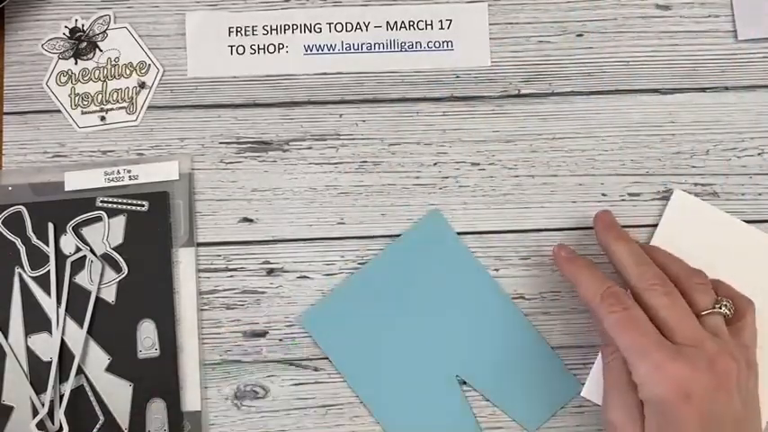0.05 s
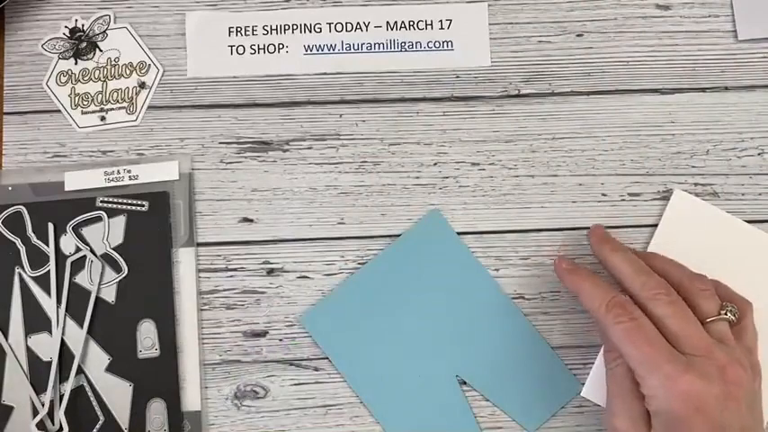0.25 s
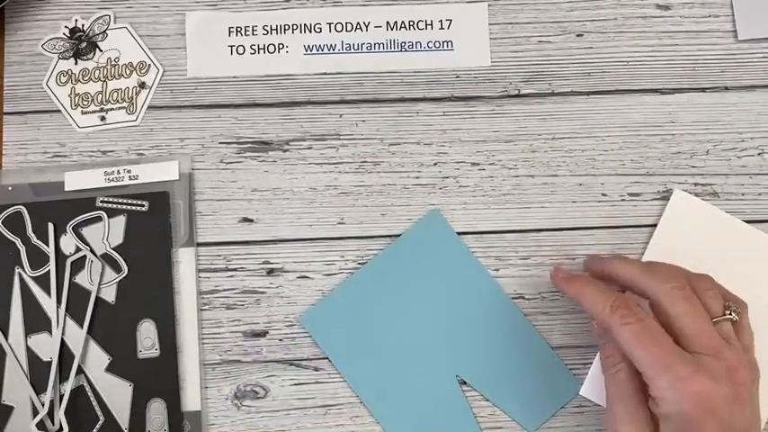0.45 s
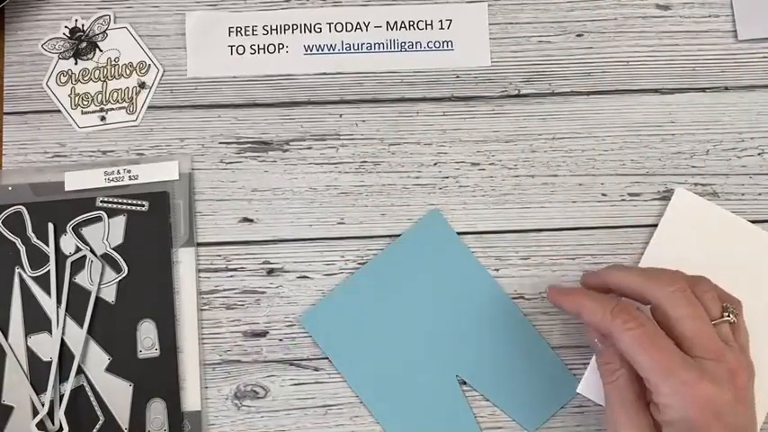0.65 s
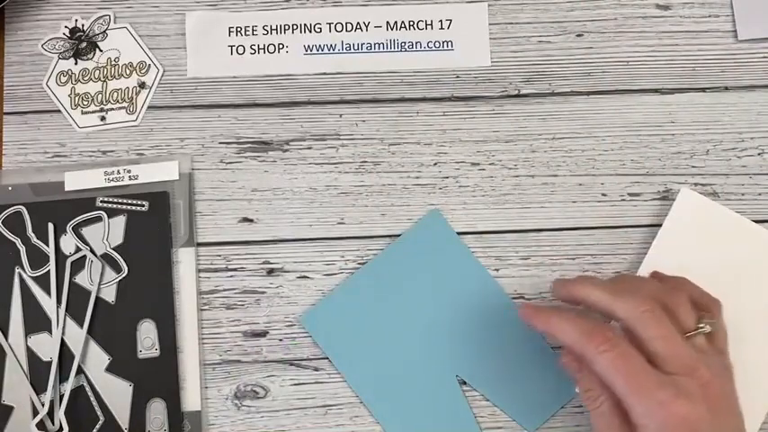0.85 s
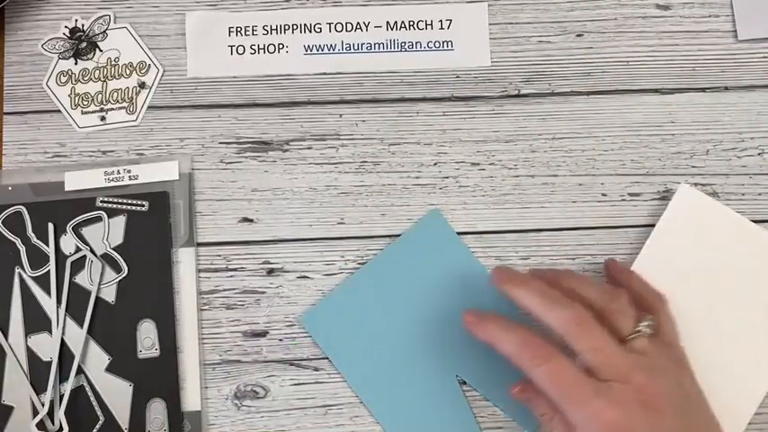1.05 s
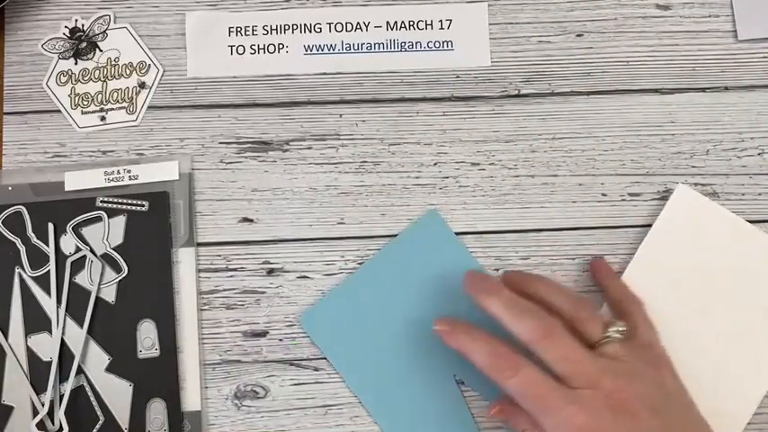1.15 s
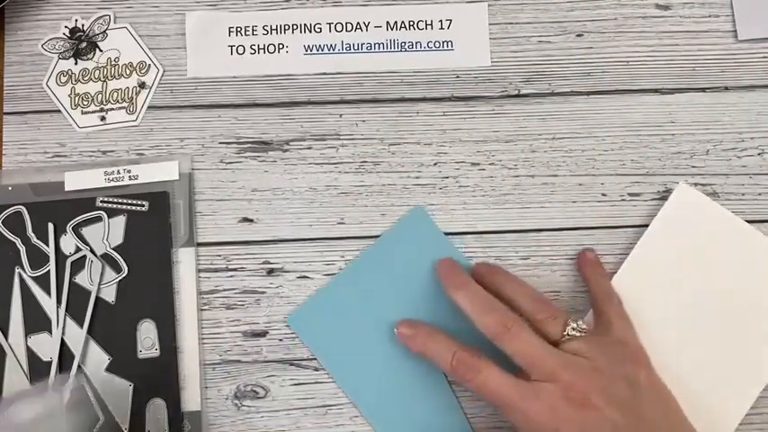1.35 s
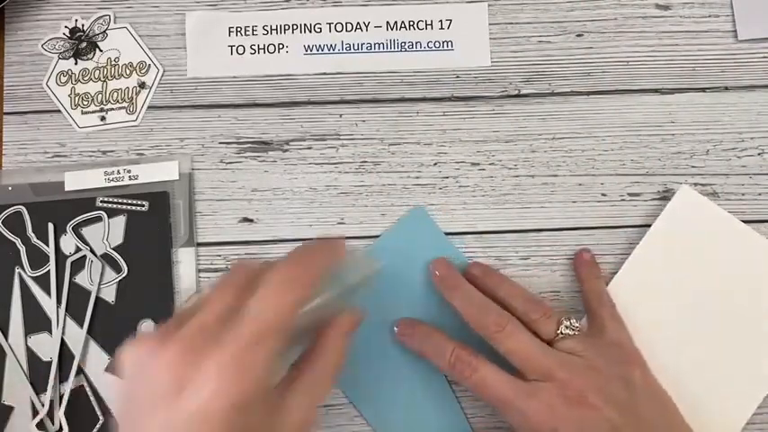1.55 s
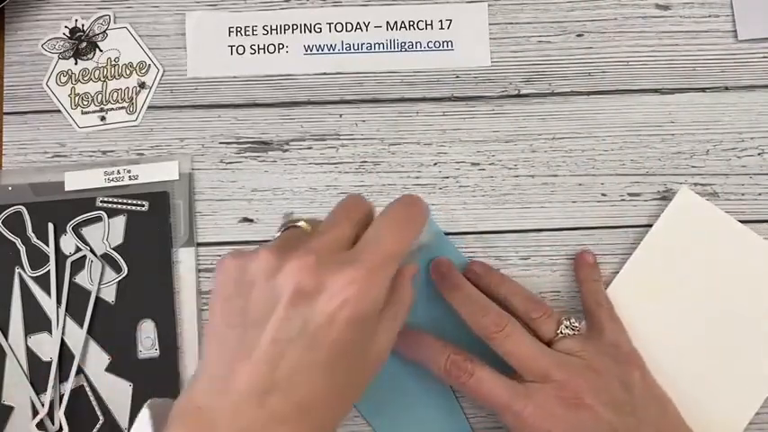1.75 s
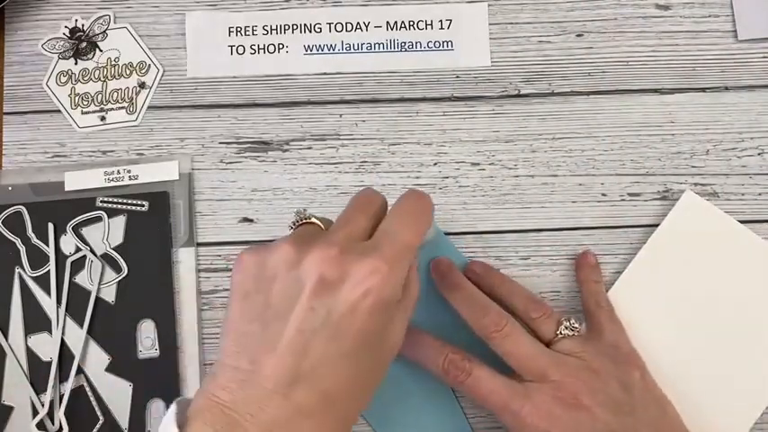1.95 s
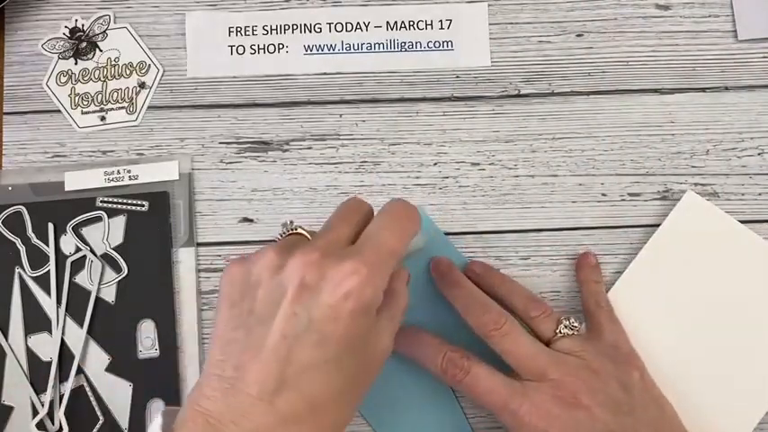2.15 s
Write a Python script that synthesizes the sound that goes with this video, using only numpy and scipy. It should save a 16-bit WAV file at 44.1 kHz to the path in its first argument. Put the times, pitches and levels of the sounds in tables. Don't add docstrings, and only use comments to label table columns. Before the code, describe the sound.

Close up in a quiet room, faint card ticks come before a sharp double-burst clatter of a small hard tool on wood, then lighter grainy scrapes and clicks, whispery paper sliding, and a dull soft thump.

```python
import sys
import numpy as np
from scipy import signal
from scipy.fft import rfft, irfft, next_fast_len
from scipy.io import wavfile
from scipy.ndimage import map_coordinates

SR = 44100
rng = np.random.default_rng(int(sys.argv[2]) if len(sys.argv) > 2 else 0)


def materialize(psi):
    bounded = np.clip(np.atleast_2d(psi).T, -1, 1)
    quanta = np.round(bounded * 32767).astype(np.int16)
    wavfile.write(sys.argv[1], SR, quanta)


def voltage_ratio(decibels):
    exponent = np.asarray(decibels, float) / 20
    return 10 ** exponent


N = 97020

# [f/Hz, width/Hz, level/dB]
DESK_MODES = [(91.4, 31, -7.5), (138.4, 16, -4), (188.6, 18, -5), (264.4, 20, -3), (319.1, 16.7, -0.5),
              (416.4, 63, -10.5), (550, 80, -14)]
# [f/Hz, width/Hz, level/dB]
CARD_MODES = [(1940, 310, 6), (3520, 1800, -4.5), (3950, 110, -8), (5950, 580, -11.5)]
# [f/Hz, width/Hz, level/dB]
HELD_TOOL_MODES = [(518, 138, -7.5), (928, 180, -7), (1316, 70, 3.5), (1972, 107, -6), (2837, 106, -7.5),
                   (4020, 170, -14), (4840, 150, -19.5), (6070, 200, -21)]
# [f/Hz, level/dB]
SNAP_SPECTRUM = [(1500, -18.5), (2500, -3), (4000, 1), (7000, -4.5), (12000, -7.5), (16000, 1.5)]
HARD_PUSH_S = 0.00031


def unit(x):
    return x / np.sqrt(np.mean(x ** 2) + 1e-20)


def along(points, hz):
    f, value = np.transpose(points)
    return np.interp(np.log(hz + 1), np.log(f + 1), value)


def wobble(rate):
    knots = rng.standard_normal(int(N * rate / SR) + 4)
    return map_coordinates(knots, [np.arange(N) * rate / SR])


def filtered(x, response):
    m = next_fast_len(x.shape[-1] + SR // 2)
    return irfft(rfft(x, m) * response(np.fft.rfftfreq(m, 1 / SR)), m)[..., :x.shape[-1]]


def body(modes, scatter_db=0):
    gain = voltage_ratio(np.zeros(len(modes)) + scatter_db)

    def response(f):
        total = 0
        for k, (hz, width, db) in enumerate(modes):
            resonance = 1j * f * width / (hz * hz - f * f + 1j * f * width)
            total = total + (-1) ** k * gain[k] * voltage_ratio(db) * resonance
        return total
    return response


def noise(spectrum):
    return unit(filtered(rng.standard_normal(N), lambda f: voltage_ratio(along(spectrum, f))))


def narrow(size, width_hz):
    z = rng.standard_normal((2, size))
    f = np.fft.fftfreq(size, 1 / SR)
    v = np.fft.ifft((z[0] + 1j * z[1]) / (1 + (2 * f / width_hz) ** 2))
    return v / np.sqrt(np.mean(abs(v) ** 2) / 2)


def contacts(rows, modes, push_s, colour):
    out, t = np.zeros(N + SR), np.arange(SR // 3) / SR
    crack = np.tile(noise(colour), 2)
    push = t / push_s * np.exp(-t / push_s)
    rise_s, scatter_db, detune, ring_top_hz = 0.00063, 3, 0.03, 5970
    for s, ring_db, thump_db, crack_db, length in rows:
        at = round(s * SR)
        burst = 2 * (1 - np.exp(-t / rise_s)) * np.exp(-2 * t / length)
        shifted = np.array(modes) * [[1 + detune * d, 1, 1] for d in rng.standard_normal(len(modes))]
        modal = body(shifted, scatter_db * rng.standard_normal(len(modes)))
        chatter = burst * rng.standard_normal(len(t))
        ring = filtered(chatter, lambda f: modal(f) / (1 + 1j * f / ring_top_hz) ** 2)
        thump = filtered(push, body(DESK_MODES, scatter_db * rng.standard_normal(len(DESK_MODES))))
        here = out[at:at + len(t)]
        here += voltage_ratio(ring_db - 4.5) * ring / abs(ring).max()
        here += voltage_ratio(thump_db + 6) * thump / abs(thump).max()
        here += voltage_ratio(crack_db + 4.5) * burst * crack[at:at + len(t)]
    return out[:N]


def tool_drop():
    # [t/s, tool ring level/dB, desk thump level/dB, crack level/dB, contact length/s]
    blows = [(.2032, -19.5, -33.5, -45, 0.0048), (.2062, -19, -30, -46.5, 0.007),
             (.2135, -23.5, -41.5, -40, 0.0096), (.2205, -27, -36, -46, 0.0071),
             (.2835, -32, -46, -55, 0.0097), (.3160, -23.5, -31, -35, 0.0058),
             (.3392, -16.5, -42, -44, 0.0072), (.3535, -16.5, -35, -38, 0.01),
             (.3580, -28.5, -39, -39.5, 0.0094), (.3660, -25.5, -48.5, -52, 0.022),
             (.3790, -22.5, -30, -58.5, 0.0032), (.3960, -35, -36, -61.5, 0.014),
             (.4250, -59, -41.5, -67, 0.0053)]
    # [f/Hz, width/Hz, level/dB]
    free_modes = [(790, 120, -1), (943, 87, 1.5), (1098, 73, -1.5), (1283, 78, -3), (1510, 93, -3.5),
                  (1758, 150, -3.5), (1965, 100, 1.5), (2420, 73, -8.5), (2637, 74, -5), (2974, 120, -6.5),
                  (3250, 150, -5), (3940, 330, -10.5), (4100, 260, -18)]
    # [f/Hz, level/dB]
    crack_spectrum = [(400, -25.5), (1001, 1), (3000, 5), (6000, -3), (10000, -12), (16000, -16)]
    return contacts(blows, free_modes, HARD_PUSH_S, crack_spectrum)


def pings():
    # [t/s, level/dB, f/Hz, decay time t60/s]
    part_rings = [(.2828, -20.5, 3480, 0.018), (.2935, -39, 3500, 0.048), (.2150, -39.5, 8400, 0.024),
                  (.2140, -35, 5970, .03), (.2310, -53.5, 9500, 0.086), (.3545, -25.5, 6600, .03),
                  (.3560, -36.5, 8680, 0.044), (.2205, -34, 3250, .025), (.2060, -31, 960, .07),
                  (.3580, -35.5, 1000, 0.11), (.3390, -22.5, 1950, .02), (.3170, -32.5, 3950, .015),
                  (.3540, -29.5, 2800, .02), (.2030, -29.5, 2700, .01), (.3170, -35, 7000, .012),
                  (.3650, -47.5, 6050, .15)]
    rise_s, waver_after_s = 0.0025, 0.04
    t, waver = np.arange(N) / SR, 0.7 * wobble(400)
    out = np.zeros(N)
    for s, db, hz, t60 in part_rings:
        level = voltage_ratio(db - 60 * np.clip(t - s, 0, None) / t60) * np.clip((t - s) / rise_s, 0, 1)
        drift = waver * np.clip((t - s) / waver_after_s, 0, 1) * np.sqrt(hz / 5000)
        out += level * np.sin(2 * np.pi * hz * (t - s) + drift)
    return out


def strokes():
    # [t/s, length/s, tool level/dB rms, hiss level/dB rms]
    drags = [
        (0.706, 0.056, -56, -63),
        (0.788, 0.05, -65, -72.5),
        (0.833, 0.06, -60.5, -90),
        (0.948, 0.088, -57.5, -89),
        (1.019, 0.026, -48, -61.5),
        (1.083, 0.05, -78, -65),
        (1.264, 0.054, -81.5, -66),
        (1.473, 0.046, -74.5, -72),
        (1.866, 0.042, -80, -68.5),
        (0.577, 0.09, -83.5, -86),
    ]
    # [f/Hz, level/dB]
    hiss_spectrum = [(800, -34), (2000, 2.5), (5000, -1.5), (9000, -4.5), (13000, -4.5), (16000, -6)]
    rise_share, fall_s = 0.46, 0.0097
    t = np.arange(N) / SR
    shapes = []
    for s, length, *_ in drags:
        rise = np.clip((t - s) / (rise_share * length), 0, 1)
        shapes.append(rise * np.exp(-np.clip(t - s - length, 0, None) / fall_s))
    tool, hiss = voltage_ratio(np.array(drags)[:, 2:]).T @ shapes
    grain = voltage_ratio(2.5 * wobble(300))
    rubbing = grain * rng.standard_normal(N)
    scale = np.std(filtered(rubbing, body(HELD_TOOL_MODES)))
    rung = np.zeros(N)
    for k, mode in enumerate(HELD_TOOL_MODES):
        grip = voltage_ratio(4 * wobble(29.93))
        rung += (-1) ** k * grip * filtered(tool * rubbing, body([mode]))
    return rung / scale + hiss * unit(np.sqrt(grain) * noise(hiss_spectrum))


def tool_ticks():
    # [t/s, tool ring level/dB, desk thump level/dB, crack level/dB, contact length/s]
    light_ticks = [(.6590, -56, -58.5, -75, 0.0053), (.7225, -41, -53.5, -71.5, 0.0073),
                   (.7345, -59, -51.5, -65.5, 0.01), (.7555, -39.5, -56, -60, 0.0055),
                   (.7640, -50, -48, -68, 0.012), (.8125, -50, -59.5, -62, 0.0056),
                   (.8705, -35.5, -50.5, -78, 0.008), (.9410, -47, -65, -71, 0.0068),
                   (.9665, -40.5, -56, -78.5, 0.005), (1.0380, -27, -55, -77, 0.0096),
                   (1.0265, -37, -61.5, -69.5, 0.0042), (.8355, -50, -67, -78, .006)]
    return contacts(light_ticks, HELD_TOOL_MODES, HARD_PUSH_S, SNAP_SPECTRUM)


def tool_press():
    # [t/s, card ring level/dB, desk thump level/dB, crack level/dB, contact length/s]
    presses = [
        (1.8705, -42.5, -36.5, -52.5, 0.0092),
        (1.8790, -64, -38.5, -70, 0.017),
        (1.8950, -59, -50, -84, 0.034),
        (1.9340, -61.5, -49.5, -93.5, 0.0081),
    ]
    return contacts(presses, CARD_MODES, 0.0011, SNAP_SPECTRUM)


def card_ticks():
    # [t/s, card ring level/dB, desk thump level/dB, crack level/dB, contact length/s]
    edge_ticks = [(.0703, -72, -83, -57.5, 0.006), (.1130, -79, -58.5, -82.5, .006),
                  (.1245, -47, -66.5, -84, 0.0042), (.1350, -51, -68, -90, 0.0061),
                  (.1478, -46.5, -60, -91, 0.0069), (.1555, -73, -59.5, -86.5, 0.004),
                  (1.4030, -64, -64, -71, 0.0069), (1.4630, -50, -66, -76.5, 0.01),
                  (1.4740, -59, -77, -82, .006), (1.4860, -61, -75, -78, .006),
                  (1.5018, -59, -70, -78, .005), (1.5105, -60, -71.5, -73, .0067),
                  (2.1548, -70, -93, -70.5, 0.0096)]
    return contacts(edge_ticks, CARD_MODES, HARD_PUSH_S, SNAP_SPECTRUM)


def sliding():
    # [t/s, card sliding level/dB, desk load level/dB]
    course = [(0.0, -99, -97), (0.12, -70, -85), (0.17, -79.5, -95), (0.24, -61, -85), (0.29, -77, -46),
              (0.32, -60, -50), (0.36, -66, -40), (0.48, -83.5, -68.5), (0.73, -67, -75),
              (0.86, -83, -55.5), (0.92, -71.5, -59), (1.06, -84, -62), (1.15, -74, -70),
              (1.37, -73.5, -77.5), (1.51, -79.5, -80.5), (1.68, -98, -91.5), (1.96, -90.5, -82),
              (2.2, -83, -94)]
    s, card_db, desk_db = np.transpose(course)
    t = np.arange(N) / SR
    creep = voltage_ratio(1.5 * wobble(50)) * rng.standard_normal(N)
    sheet = body(CARD_MODES[:1] + [(3420, 17000, 0.5)])
    card = unit(filtered(filtered(creep, body(CARD_MODES)), sheet))
    load = voltage_ratio(4.0 * wobble(40)) * rng.standard_normal(N)
    desk = unit(filtered(load, lambda f: body(DESK_MODES)(f) / (1 + (f / 500) ** 2)))
    return voltage_ratio(np.interp(t, s, card_db)) * card + voltage_ratio(np.interp(t, s, desk_db)) * desk


def scuffs():
    # [t/s, length/s, level/dB rms, f/Hz, width/Hz]
    rubs = [(0.063, 0.026, -71.5, 3880, 900), (0.721, .008, -60.5, 3990, 300),
            (0.734, .022, -59.5, 3700, 400), (.752, 0.0067, -56, 1993, 250), (.753, .007, -61, 5250, 300),
            (.810, 0.0078, -73, 6200, 600), (.812, .008, -66, 2220, 700), (0.845, .012, -55, 1350, 150),
            (0.937, 0.0073, -67.5, 3010, 500), (1.049, 0.016, -64.5, 6100, 250),
            (1.101, 0.018, -69, 6100, 300), (1.114, .015, -72.5, 5200, 300), (1.278, .014, -70, 2950, 200),
            (1.284, .03, -77.5, 4120, 250), (1.401, .012, -66.5, 2290, 250), (1.402, .012, -72, 3310, 500),
            (1.478, .04, -82, 4600, 350), (1.499, 0.023, -74.5, 1248, 300), (1.507, .012, -66.5, 1838, 300),
            (1.507, 0.0096, -71.5, 3180, 400), (1.860, .008, -66, 500, 400),
            (1.871, 0.029, -63.5, 599, 351), (1.884, 0.05, -73, 2807, 1305), (2.071, .1, -85, 5350, 350),
            (2.074, 0.033, -84, 1910, 499.5), (2.151, 0.0075, -69.5, 2790, 800),
            (2.164, 0.037, -79, 2600, 1100), (0.601, 0.11, -79, 3920, 400)]
    edge_s = 0.004
    out, t = np.zeros(N + SR), np.arange(SR // 4) / SR
    for s, length, db, hz, width_hz in rubs:
        shape = np.clip(t / edge_s, 0, 1) * np.exp(-np.clip(t - length, 0, None) / edge_s)
        patch = (narrow(len(t), width_hz) * np.exp(2j * np.pi * hz * t)).real
        out[round(s * SR):][:len(t)] += voltage_ratio(db) * shape * patch
    return out[:N]


def whistle():
    # [t/s, f/Hz, level/dB rms]
    note = [
        (1.1, 1950, -90),
        (1.16, 2053, -77),
        (1.21, 2142, -76.5),
        (1.27, 1853, -79.5),
        (1.3, 2300, -77),
        (1.34, 2050, -76.5),
        (1.4, 2150, -79),
        (1.49, 2065, -71),
        (1.54, 1912, -95),
    ]
    s, hz, db = np.transpose(note)
    t = np.arange(N) / SR
    carrier = np.exp(2j * np.pi * np.cumsum(np.interp(t, s, hz)) / SR)
    return voltage_ratio(np.interp(t, s, db, -150, -150)) * (narrow(N, 190) * carrier).real


def room(x):
    # [f/Hz, t60/s]
    decay = [(150, 0.33), (1000, 0.31), (4000, 0.26), (12000, 0.22)]
    delay_s = 0.006
    hz, t, z = signal.stft(rng.standard_normal(SR // 2), SR, nperseg=256)
    tail = signal.istft(z * voltage_ratio(-60 * t / along(decay, hz)[:, None]), SR, nperseg=256)[1]
    delayed = np.pad(x, (round(delay_s * SR), 0))
    return signal.fftconvolve(delayed, tail / np.linalg.norm(tail))[:N]


def background():
    # [f/Hz, density level/dB]
    air_spectrum = [(120, -27), (200, -5.5), (347, -5.5), (432, -12), (1060, -13.5), (1160, -12.5),
                    (4600, -20.5), (11500, -19), (16000, -20)]
    # [f/Hz, density level/dB]
    rumble_spectrum = [(12, -62), (20, -46.5), (48, -17), (56, -4), (64, -3.5), (81, -9.5), (94, -3.5),
                       (108, -13), (260, -31.5), (340, -65), (570, -120)]
    air = voltage_ratio(-80) * noise(air_spectrum)
    return air + voltage_ratio(-65 - 2.5 * wobble(25)) * noise(rumble_spectrum)


def scene():
    free = tool_drop() + pings() + tool_press()
    held = strokes() + tool_ticks() + card_ticks() + sliding() + scuffs() + whistle()
    into_room = free + voltage_ratio(-5) * held
    return (free + held + voltage_ratio(-11.5) * room(into_room) + background())[None]


def low_pass(x):
    return signal.sosfilt(signal.butter(12, 16660, fs=SR, output="sos"), x)


def record(dry):
    def band(f):
        bass = (1j * f / (55.4 + 1j * f)) ** 2
        return bass / (1 + np.exp(np.clip((f - 16000) / 250, -40, 40)))
    mix = filtered(dry, band)
    return low_pass(mix)


dry = scene()
out = record(dry)
materialize(out)
```